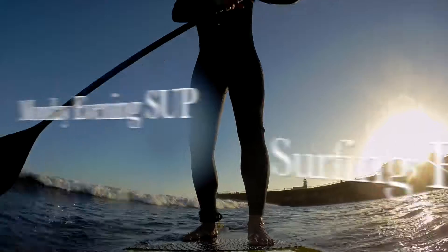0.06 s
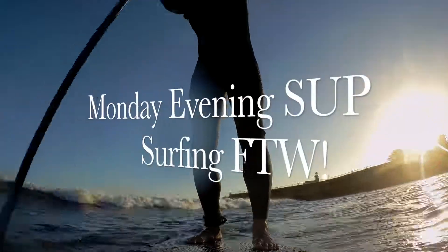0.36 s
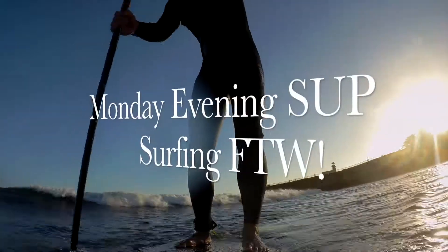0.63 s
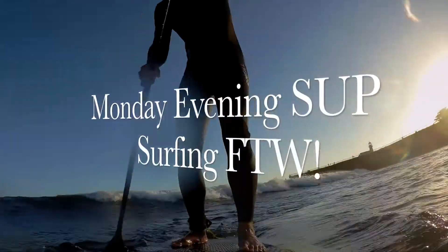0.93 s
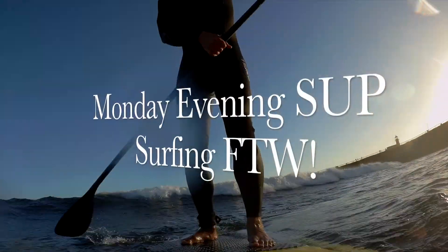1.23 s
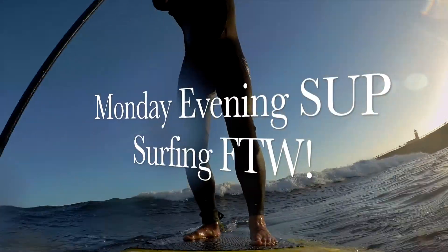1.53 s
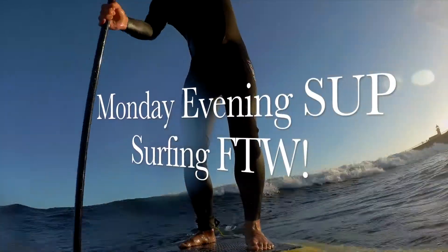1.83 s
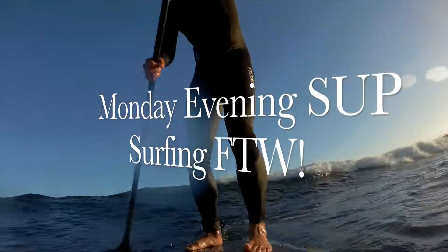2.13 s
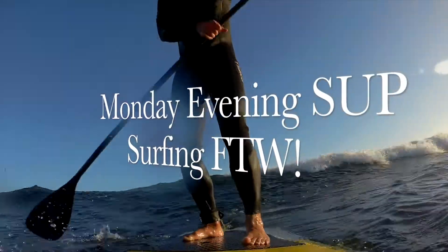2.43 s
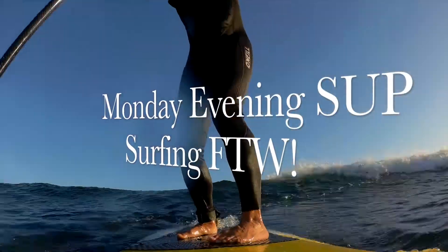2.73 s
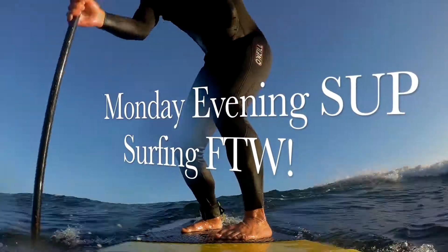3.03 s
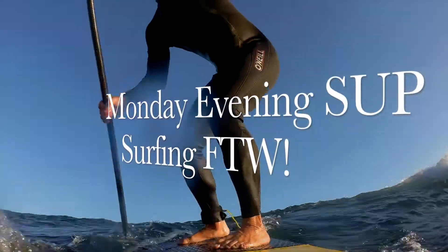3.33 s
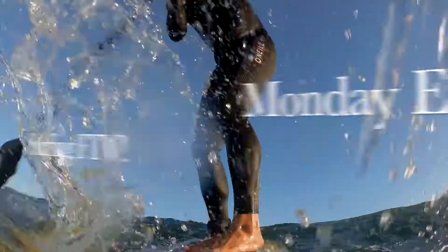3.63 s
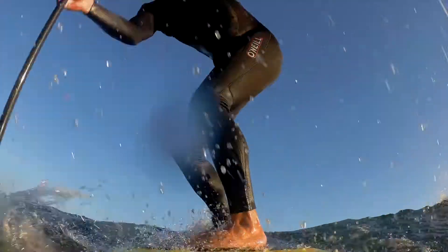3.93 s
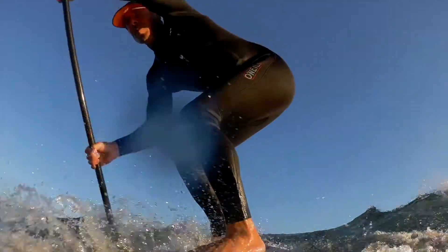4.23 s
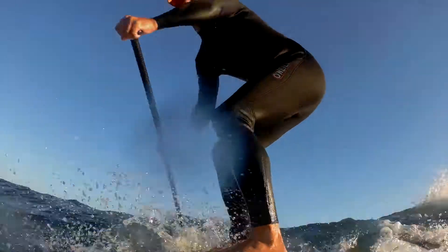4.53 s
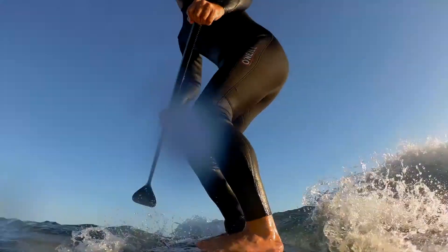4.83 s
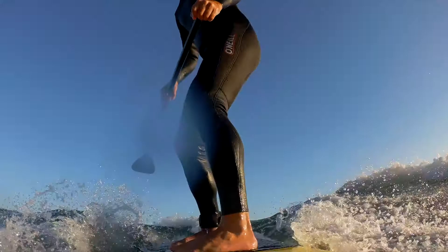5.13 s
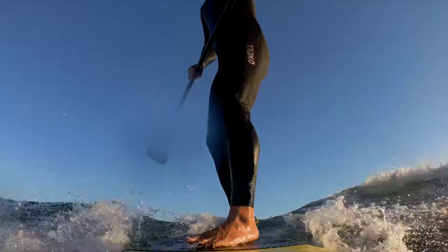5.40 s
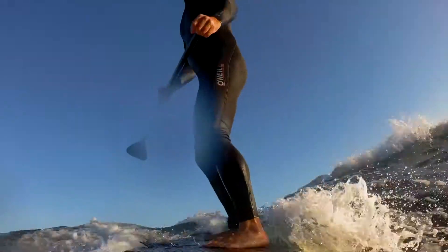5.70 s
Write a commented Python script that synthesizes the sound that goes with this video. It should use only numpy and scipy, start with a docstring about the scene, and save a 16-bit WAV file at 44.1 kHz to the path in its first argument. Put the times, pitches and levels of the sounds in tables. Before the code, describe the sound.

Muffled seawater gurgles and slaps under a paddleboard, the hull knocking and booming louder as it picks up speed.

```python
"""Paddleboard driven onto a wave

Heard from a sealed camera on the deck, whose housing muffles it all. Water gurgles, fizzes and slaps
under the hull, which knocks, booms and flexes as the board gathers speed. The nose slams down once,
trapped air rings, and spray ticks on the housing."""
import sys
import numpy as np
from scipy import signal
from scipy.io import wavfile
from scipy.ndimage import uniform_filter1d

SR = 44100
rng = np.random.default_rng(int(sys.argv[2]) if len(sys.argv) > 2 else 0)


def wav_record(signal):
    """Record a signal, one row per channel, as 16-bit PCM in the file named by sys.argv[1]."""
    frames = np.transpose(np.atleast_2d(signal))
    bounded = np.clip(frames, -1, 1)
    # unit amplitude maps onto the largest positive 16-bit level
    quanta = np.round(bounded * 32767).astype(np.int16)
    wavfile.write(sys.argv[1], SR, quanta)


N = 262968
TIME = np.arange(N) / SR

# tone of the microphone hiss: f/Hz, relative level/dB
HISS_EQ = [(100, 6), (1000, 10), (3000, 7), (6000, 1.5), (9000, 0.5), (12500, -2), (15000, -4.5)]
# what the deck and the housing let through: f/Hz, gain/dB
DECK_EQ = [(200, -13.5), (330, -19), (470, 4.5), (570, -7), (750, -8.5), (870, -12.5), (1680, -17),
           (2250, -30), (3750, -35.5), (4250, -46.5), (5100, -43.5), (6600, -53.5), (14000, -81.5)]
# wash along the hull, building with speed: t/s, level/dB, brightness/dB
WASH_BED = [(0.0, -59.5, 4), (0.3, -71, -1), (0.52, -72.5, -3), (0.7, -67, 7.5), (1.3, -66.5, 0.5),
            (1.38, -71, 3.5), (1.62, -62, 3), (1.92, -70.5, 10.5), (2.3, -61, 1), (2.85, -61.5, 2),
            (3.2, -54.5, 4), (3.45, -67, 6), (3.7, -57.5, 3), (4.09, -59, 8), (4.29, -57, 1.5),
            (4.58, -49, -6.5), (4.8, -56.5, -1.5), (5.4, -53.5, -7.5), (5.72, -57.5, -3), (5.96, -47, -8.5)]
# water thrown against the hull by paddle and chop: t/s, length/s, level/dB, brightness/dB
WATER_SURGES = [(0.03, 0.1, -61.5, -6), (0.102, .03, -52.5, 2), (0.136, 0.026, -50, 6),
                (0.188, 0.027, -55.5, 7.5), (0.444, 0.049, -56.5, -24), (0.555, 0.017, -58.5, 12),
                (0.653, 0.067, -60.5, 11.5), (0.78, 0.058, -56.5, 5), (0.9, 0.14, -72, -3),
                (1.038, .08, -58, 10), (1.134, 0.043, -54.5, 7.5), (1.206, 0.048, -59.5, 7),
                (1.431, 0.082, -58, -9), (1.525, 0.048, -54, 5.5), (1.664, 0.044, -56, 1.5),
                (1.778, 0.044, -65.5, 13), (2.039, 0.1, -55.5, -0.5), (2.223, 0.019, -60, -7),
                (2.331, 0.12, -58, 13), (2.414, 0.046, -46.5, 8.5), (2.64, 0.013, -49, -4),
                (2.729, 0.083, -56, 2.5), (2.884, 0.03, -41.5, -1.5), (2.94, 0.12, -55.5, 10),
                (3.019, 0.33, -52.5, 5.5), (3.239, 0.031, -40, 4.5), (3.262, 0.048, -37, 3),
                (3.32, 0.078, -47.5, 0), (3.416, 0.026, -62.5, -9), (3.496, 0.059, -58, 7.5),
                (3.767, 0.063, -59, 14), (3.805, 0.055, -45, 1.5), (3.87, 0.062, -40, 1),
                (4.116, 0.077, -40, 0), (4.207, 0.033, -41, -2), (4.313, 0.087, -53, -9),
                (4.467, 0.038, -43, -7), (4.496, 0.042, -46, -1), (4.608, 0.11, -44, -7.5),
                (4.838, 0.14, -48.5, -4.5), (5.03, 0.076, -48, -9), (5.12, 0.052, -51, -4),
                (5.26, 0.071, -48, -10), (5.311, 0.092, -47.5, -4), (5.458, 0.13, -47, -7),
                (5.594, 0.022, -45.5, -12), (5.835, 0.15, -53, -22)]
# single plips close by: t/s, level/dB, f/Hz
CLOSE_PLIPS = [(0.559, -52, 1270), (0.91, -58, 1640), (1.0667, -52, 1380), (1.1103, -55, 1240),
               (1.5313, -58, 1640), (1.574, -56, 1460), (1.791, -50.5, 1240), (1.824, -66, 3420),
               (1.8565, -53, 1200), (1.911, -65, 3560), (1.983, -58, 1510), (2.0897, -53.5, 1130),
               (3.886, -36.5, 1440)]
# drops on the housing: t/s, splat level/dB, f/Hz, rise/s, ring level/dB
HOUSING_DROPS = [(2.546, -72, 7900, .0033, -72), (2.628, -64.5, 5860, .0057, -90),
                 (3.539, -62, 6500, 0.0013, -83), (3.558, -59, 4900, 0.0033, -81),
                 (3.5627, -56, 12500, 0.00075, -67), (3.594, -57, 3860, 0.0015, -51),
                 (3.69, -68, 6000, 0.0018, -85), (3.72, -63, 6000, 0.0012, -69),
                 (4.006, -62, 8400, 0.00082, -80), (5.327, -68.5, 10400, 0.0047, -71),
                 (5.367, -56.5, 3200, 0.0016, -56), (5.472, -71, 8420, 0.0068, -86)]
# air squeezed under the nose: t/s, length/s, level/dB, start f/Hz, middle f/Hz, end f/Hz
AIR_POCKETS = [(3.258, 0.032, -36, 552, 666, 800), (3.268, 0.026, -44, 476, 476, 460),
               (3.296, .034, -36.5, 388, 361, 352), (3.295, 0.032, -36, 261, 237.4, 230),
               (3.318, 0.047, -44.5, 800, 892, 906), (3.322, 0.038, -49, 482, 485, 470),
               (3.326, 0.057, -43, 260, 297, 325), (3.362, 0.049, -51, 963, 935, 890)]
# slaps on the hull: t/s, ring level/dB, trapped air f/Hz, ring t60/s, crack level against the ring/dB
HULL_SLAPS = [(0.113, -44.5, 537, 0.14, -3), (0.149, -56, 760, 0.037, 9), (0.355, -54, 430, .09, -16),
              (0.455, -53.5, 457, 0.11, -5.5), (0.559, -47.5, 551, 0.081, 0.5),
              (0.665, -50, 580, 0.065, -13), (0.726, -48, 476, 0.071, -16), (0.805, -50, 605, 0.039, -17),
              (0.912, -51.5, 525, 0.057, -1), (1.059, -46.5, 602, 0.092, -9), (1.149, -41, 642, .06, -13),
              (1.47, -45, 460, .05, -25), (1.543, -29.5, 489, 0.045, -12), (2.345, -50, 497, 0.073, 9.5),
              (2.381, -44.5, 560, 0.094, -12), (2.405, -36.5, 514, .04, -16), (2.445, -39, 515, 0.12, -7),
              (2.642, -39.5, 430, 0.015, -11.5), (2.889, -35.5, 408, 0.011, -17),
              (2.904, -39.5, 523, 0.11, -24), (3.063, -39, 491, 0.045, -1), (3.144, -45.5, 496, 0.11, -22),
              (3.181, -35.5, 496, 0.04, -6), (3.247, -35, 600, 0.055, -2), (3.269, -28, 468, .12, -11),
              (3.302, -31.5, 440, 0.019, 0.5), (3.529, -34, 440, 0.064, -21), (3.85, -32, 495, 0.061, -15),
              (3.885, -31.5, 463, 0.11, -0.5), (3.9, -31, 512.5, 0.14, -6), (4.125, -32.5, 486, 0.036, -4),
              (4.148, -32, 479, .12, -16), (4.315, -44.5, 770, 0.056, -12), (4.47, -27, 466, 0.064, -18),
              (4.499, -33, 522, .04, -11), (4.566, -40, 507, 0.019, -12), (4.615, -39.5, 517, 0.03, -11),
              (4.692, -35.5, 410, 0.023, -11), (4.749, -41.5, 503, 0.066, -19),
              (4.862, -40, 492, 0.16, -13), (5.032, -39, 497, 0.056, -22), (5.135, -40, 501, .056, -12),
              (5.243, -35, 481, 0.046, -28), (5.596, -34, 496, 0.025, -14.5)]
# modes of the hull: f/Hz, level against the slap/dB, t60/s
HULL_MODES = [(244, -29.5, 0.013), (460, -20, 0.42), (713.5, -13.5, 0.062), (1330, -28, 0.058)]
# slow bending of the whole board: t/s, level/dB
BOARD_FLEX = [(0.0, -56), (0.4, -70), (0.8, -58.5), (1.24, -58), (1.86, -68), (2.22, -42), (2.52, -46.5),
              (2.74, -35), (3.04, -45), (3.35, -42.5), (3.47, -49.5), (3.7, -35.5), (3.9, -37.5),
              (4.02, -49.5), (5.05, -51), (5.34, -34.5), (5.53, -44.5), (5.61, -27.5), (5.96, -40.5)]
# steady shaking by the chop: t/s, boom level/dB, buffeting level/dB
CHOP_SHAKE = [(0.0, -62.5, -68), (1.25, -61, -64), (1.87, -69, -75.5), (2.1, -61, -66), (2.6, -53, -61),
              (3.15, -50, -58.5), (3.55, -47, -53), (3.78, -57.5, -54), (3.95, -48, -43), (4.4, -44, -48.5),
              (4.8, -42.5, -53), (5.05, -45.5, -47.5), (5.55, -46.5, -42.5), (5.76, -55.5, -49.5),
              (5.96, -46, -46)]
# heaves of chop that keep the hull booming: t/s, length/s, level/dB
CHOP_HEAVES = [(0.202, 0.061, -55), (0.338, 0.044, -58.5), (0.473, 0.052, -54.5), (1.048, 0.062, -53),
               (1.652, 0.062, -50), (2.33, 0.033, -51), (2.41, 0.071, -42), (2.608, 0.099, -42.5),
               (2.874, 0.037, -40.5), (3.26, .03, -34.5), (3.42, 0.038, -46), (3.872, .09, -42),
               (4.13, 0.076, -40), (4.585, .12, -37), (4.898, .12, -39), (5.305, 0.11, -35),
               (5.533, 0.069, -35), (5.867, 0.034, -40)]
# heavy blows on the hull: t/s, level/dB, f/Hz, t60/s
HULL_BLOWS = [(0.1262, -38.5, 122.2, 0.24), (1.47, -47, 121, 0.077), (1.545, -29, 119, 0.22),
              (2.956, -40.5, 124, 0.087), (3.302, -16.5, 116.5, 0.25), (3.565, -34, 117.5, 0.11),
              (3.946, -27, 105.6, 0.11), (4.341, -40, 118, 0.088), (4.958, -29.5, 118, .12),
              (5.088, -33, 123, 0.2), (5.319, -22.5, 73, 0.04), (5.389, -27, 102, .1),
              (5.54, -25, 109, 0.099), (5.606, -24.5, 99.4, 0.066)]


def amp(db):
    """Decibels to gain."""
    return 10 ** (np.asarray(db) / 20)


def unit_rms(x):
    """Scales to rms 1."""
    return x / np.sqrt(np.mean(x ** 2) + 1e-20)


def steadied(x, seconds):
    """Rides the rms to 1 over the given time, keeping all faster detail."""
    size = max(int(seconds * SR), 8)
    power = uniform_filter1d(uniform_filter1d(x ** 2, size), size)
    return x / np.sqrt(abs(power) + 1e-6 * np.mean(x ** 2))


def automation(rows):
    """Each dB column of a timed table as a curve over the whole scene."""
    times, *columns = np.transpose(rows)
    return [np.interp(TIME, times, column) for column in columns]


def add(mix, start, sound):
    """Mixes a sound in at start, in seconds."""
    part = mix[max(round(start * SR), 0):][:len(sound)]
    part += sound[:len(part)]


def band(x, lo_hz, hi_hz, order=3):
    """Causal band-pass."""
    return signal.sosfilt(signal.butter(order, [lo_hz, hi_hz], "band", fs=SR, output="sos"), x)


def eq(x, points, size=4096):
    """Minimum-phase EQ through the given (Hz, dB) points."""
    hz, db = np.transpose(points)
    bin_hz = abs(np.fft.fftfreq(size, 1 / SR)) + 1
    log_gain = np.log(amp(np.interp(np.log(bin_hz), np.log(hz), db)))
    taps = np.fft.ifft(np.exp(np.conj(signal.hilbert(log_gain)))).real
    return signal.oaconvolve(x, taps[:size // 2])[:len(x)]


def noise(samples=N):
    """White noise."""
    return rng.standard_normal(samples)


def decay(t, t60):
    """Falls by 60 dB in t60."""
    return np.exp(-np.log(1000) * t / t60)


def swell(length, rise_s, sag_db, t60):
    """Envelope that rises, sags while held (a negative sag grows), then dies away."""
    t = np.arange(int((length + t60) * SR)) / SR
    held = np.minimum(t / rise_s, 1) * amp(-sag_db * np.minimum(t / length, 1))
    return held * decay(np.maximum(t - length, 0), t60)


def ring(hz, t60, rise=0., attack=0.00017):
    """A damped tone whose pitch climbs by the fraction rise as it dies."""
    t = np.arange(int(t60 * SR) + 8) / SR
    shape = (1 - np.exp(-(t / attack) ** 2)) * decay(t, t60)
    return shape / shape.max() * np.sin(2 * np.pi * hz * t * (1 + rise * t / t60 / 2))


def impacts(per_s, spread_db):
    """Random clicks, mostly small, with a few louder ones as the spread widens."""
    at = np.flatnonzero(rng.random(N, dtype=np.float32) * SR < per_s)
    train = np.zeros(N)
    train[at] = rng.choice([-1, 1], len(at)) * amp(spread_db * np.minimum(rng.exponential(1, len(at)), 4))
    return train


def bubbles(density, spread_db, cycles, rise, sizes=40):
    """Bubbles of many sizes, each ringing for the given cycles; small, high ones are more common."""
    out = np.zeros(N)
    for hz in np.geomspace(380, 5000, sizes):
        tone = ring(hz * rng.uniform(1.0, 1.03), cycles / hz, rise, attack=.5 / hz)
        births = impacts(density / sizes * hz / 1500, spread_db)
        out += signal.oaconvolve(births, tone)[:N] * np.sqrt(hz)
    return unit_rms(out)


def hiss():
    """The microphone lays a faint, steady noise floor."""
    return amp(-81.5) * unit_rms(eq(noise(), HISS_EQ))


def water_gain(bright_share):
    """Fader for one water band: wash and surges add in power, each with a share of its brightness."""
    wash_db, wash_bright_db = automation(WASH_BED)
    power = amp(wash_db + bright_share * wash_bright_db) ** 2
    for start, length, db, bright_db in WATER_SURGES:
        surge = swell(length, rise_s=0.011, sag_db=2, t60=0.097)
        add(power, start, (amp(db + bright_share * bright_db) * surge) ** 2)
    return np.sqrt(power)


def water(gurgle_gain, splash_gain, fizz_gain):
    """Clumps of bubbles and droplets strike the hull and come muffled through the deck."""
    churn = np.interp(TIME, [0, 2.2, 3.2, 5.96], [.35, .45, 1.3, 2.0])  # water breaks up with speed
    lumps = unit_rms(band(noise(), 25, 110, order=1))
    clumps = amp(1.4 / np.sqrt(churn) * lumps)  # slow water is lumpier
    bubbling = bubbles(density=1600 * churn, spread_db=1.5, cycles=28.4, rise=0.23)
    droplets = amp(1.5) * unit_rms(impacts(per_s=3000 * churn, spread_db=3.0))
    foam = amp(-5.5) * churn * noise()
    muffled = eq((bubbling + droplets + foam) * clumps, DECK_EQ)
    gurgle = steadied(band(muffled, 160, 935), 0.022) * gurgle_gain
    deck_note = steadied(band(muffled, 261, 266, order=2), 0.057) * gurgle_gain * amp(-22)
    splash = steadied(band(muffled, 851, 2260), 0.056) * splash_gain * amp(-7.5)
    fizz = steadied(band(muffled, 2250, 9600), 0.062) * fizz_gain * amp(-20.5)
    return gurgle + deck_note + splash + fizz


def trickle(splash_gain, until_s=3.0):
    """Drips from the blade each ring one small bubble, fading out as the calm water ends."""
    drips = bubbles(density=120, spread_db=3.0, cycles=62, rise=.2)
    muffled = unit_rms(band(eq(drips, DECK_EQ), 1200, 6000, order=2))
    calm = np.clip(1 - (TIME / until_s) ** 4, 0, 1)
    return amp(-17) * calm * splash_gain * muffled


def spray(start_s=3.9):
    """A short shower of tiny droplets patters on the housing after the nose slams down."""
    shower = np.zeros(N)
    add(shower, start_s, swell(length=.2, rise_s=.02, sag_db=5.5, t60=.15))
    patter = unit_rms(band(impacts(per_s=260, spread_db=0), 3500, 11000, order=1))
    return amp(-85) * shower * patter


def drops():
    """Single drops of spray splat on the housing, and their tiny bubbles ring."""
    out, t = np.zeros(N), np.arange(SR // 25) / SR
    for start, splat_db, hz, rise_s, ring_db in HOUSING_DROPS:
        envelope = (t / rise_s) ** 2 * np.exp(-2 * t / rise_s)
        splat = band(noise(len(t)), hz * .7, hz * 1.3, order=1) * envelope
        add(out, start, amp(splat_db) * splat / abs(splat).max())
        add(out, start, amp(ring_db) * ring(hz, t60=2 * rise_s, rise=0.11, attack=rise_s))
    return out


def plips():
    """A falling drop ticks on the surface and pinches off one bubble, which chirps upward."""
    out, t = np.zeros(N), np.arange(SR // 40) / SR
    for start, db, hz in CLOSE_PLIPS:
        burst = noise(len(t)) * decay(t, 0.0081)
        tick = band(eq(burst, DECK_EQ), 690, 5000, order=2)
        add(out, start, amp(db) * tick / abs(tick).max())
        add(out, start, amp(db) * ring(hz, t60=0.029, rise=0.15, attack=0.00081))
    return out


def pockets():
    """Large air pockets swell and glide in pitch as the hull squeezes them."""
    out = np.zeros(N)
    for start, length, db, *glide_hz in AIR_POCKETS:
        progress = np.linspace(0, 1, int(length * SR))
        hz = np.interp(progress, [0, .5, 1], glide_hz)
        tone = np.sin(2 * np.pi * np.cumsum(hz) / SR)
        flutter = 1 + 0.041 * unit_rms(band(noise(len(tone)), 40, 160, order=1))
        add(out, start, amp(db) * flutter * np.sin(np.pi * progress) * tone)
    return out


def slaps():
    """Each slap cracks on the hull, rings its modes and traps air that sheds smaller bubbles."""
    out, t = np.zeros(N), np.arange(SR // 8) / SR
    for start, db, hz, t60, crack_db in HULL_SLAPS:
        burst = noise(len(t)) * (decay(t, .02) + amp(-13) * decay(t, .08))
        crack = band(eq(burst, DECK_EQ), 960, 5800, order=2)
        add(out, start, amp(db + crack_db) * crack / abs(crack).max())
        add(out, start, amp(db) * ring(hz, t60, rise=0.14, attack=0.0012))  # the trapped air
        for mode_hz, mode_db, mode_t60 in HULL_MODES:
            add(out, start, amp(db + mode_db) * ring(mode_hz, mode_t60, attack=0.002))
        for lateness, smallness in rng.random(size=(3, 2)):
            ratio = 1.3 + 1.6 * smallness  # smaller bubbles are higher, shorter and fainter
            bubble = ring(hz * ratio, t60=0.16 / ratio, rise=0.036, attack=.001) / ratio
            add(out, start + 0.00276 + .022 * lateness, amp(db - 16) * bubble)
    return band(out, 260, 9000, order=2)


def chop_gains():
    """Faders for boom and buffeting: steady shaking and single heaves add in power."""
    boom_db, buffet_db = automation(CHOP_SHAKE)
    power = np.zeros(N)
    for start, length, db in CHOP_HEAVES:
        add(power, start, (amp(db) * swell(length, rise_s=0.014, sag_db=-2, t60=0.28)) ** 2)
    heave = np.sqrt(power)
    return np.hypot(amp(boom_db), heave), np.hypot(amp(buffet_db), heave * amp(-13))


def board():
    """The low end: chop booms and buffets the hull, the deck thuds and the whole board bends."""
    boom_gain, buffet_gain = chop_gains()
    flex_gain = amp(automation(BOARD_FLEX)[0])
    resonance = band(noise(), 118.3, 127.1, order=1)
    boom = steadied(band(resonance, 92, 152, order=2), 0.098) * boom_gain
    buffet = steadied(band(noise(), 50, 108), 0.041) * buffet_gain
    flex = steadied(band(noise(), 30.5, 34, order=2), 0.08) * flex_gain
    thud = steadied(band(noise(), 170, 300, order=2), 0.067) * boom_gain * amp(-25.5)
    return thud + band(boom, 88, 175, order=2) + band(buffet, 27, 190) + band(flex, 15, 42, order=2)


def blows():
    """Heavy hits set the hull booming, and the deck rings with it; the hardest is the nose slam."""
    out = np.zeros(N)
    for start, db, hz, t60 in HULL_BLOWS:
        add(out, start, amp(db) * ring(hz, t60, attack=0.0097))
        add(out, start, amp(db - 31) * ring(hz=252, t60=t60 / 2, attack=0.0049))  # the deck
    octave = band(out ** 2, 260, 500, order=2)  # the air cushion stiffens when squeezed hard
    return out - octave


def scene():
    """Mono mix of water, hull and spray over a faint hiss."""
    gurgle_gain, splash_gain, fizz_gain = (water_gain(bright_share) for bright_share in (0, 0.62, 1))
    bed = hiss() + water(gurgle_gain, splash_gain, fizz_gain)
    water_detail = slaps() + plips() + trickle(splash_gain) + pockets()
    hull = board() + blows()
    return (bed + water_detail + hull + drops() + spray())[None]


def record(dry):
    """Short fades at both ends, then the camera's band limit."""
    faded = dry * signal.windows.tukey(N, .002)
    lowpass = signal.firwin(511, cutoff=14750, window=("kaiser", 9), fs=SR)
    return signal.oaconvolve(faded, lowpass[None], "same")


dry = scene()
out = record(dry)
wav_record(out)
```